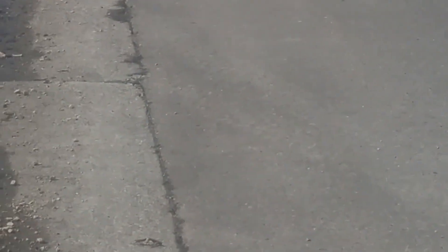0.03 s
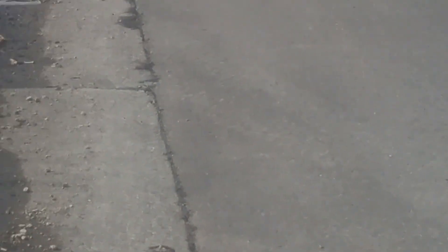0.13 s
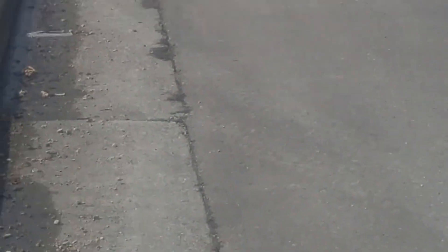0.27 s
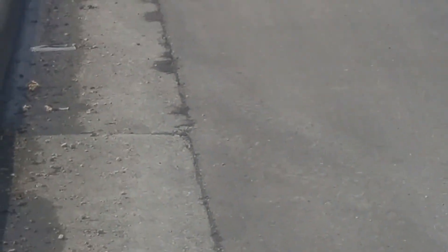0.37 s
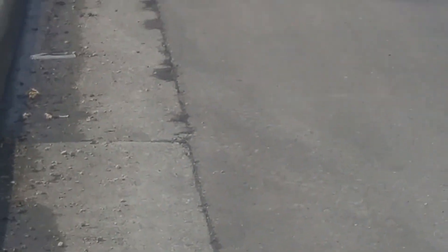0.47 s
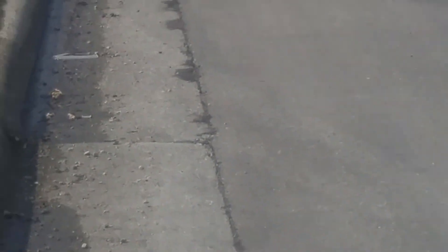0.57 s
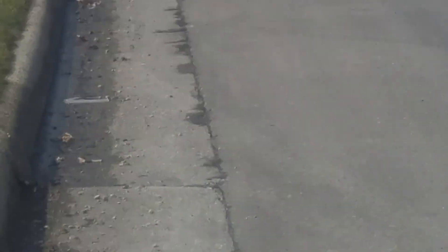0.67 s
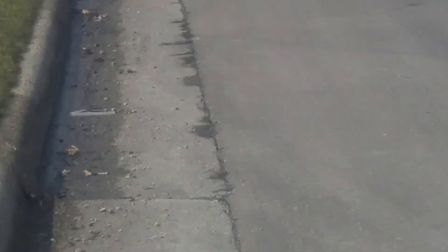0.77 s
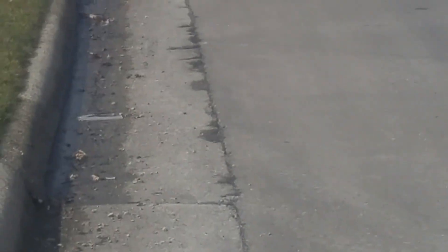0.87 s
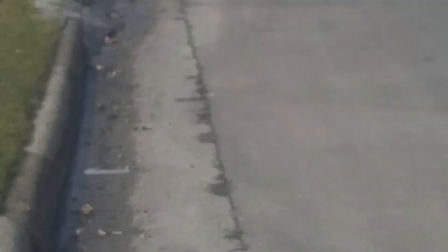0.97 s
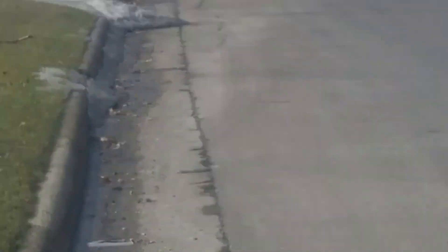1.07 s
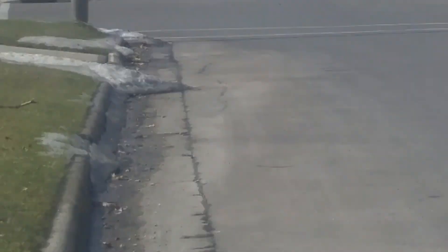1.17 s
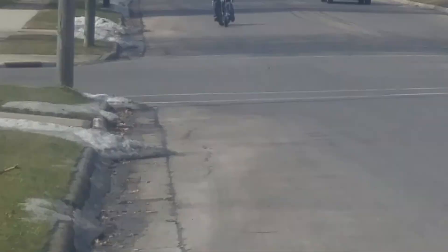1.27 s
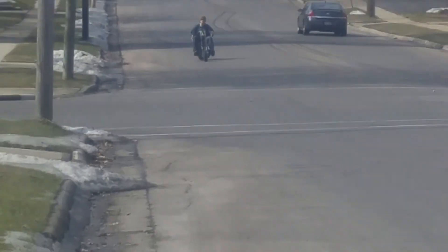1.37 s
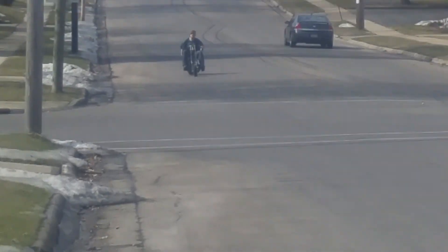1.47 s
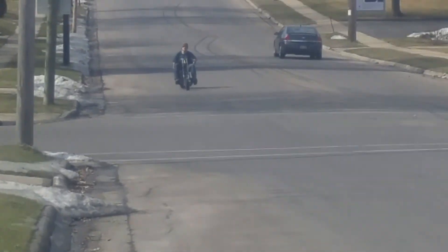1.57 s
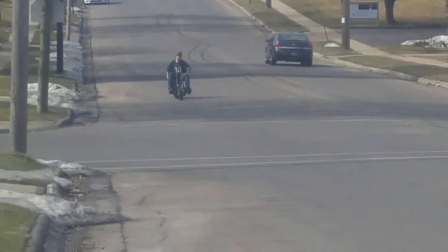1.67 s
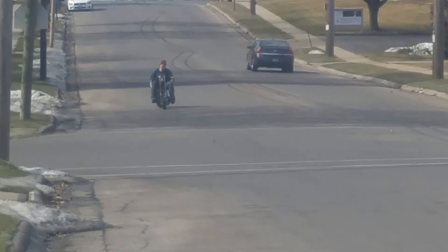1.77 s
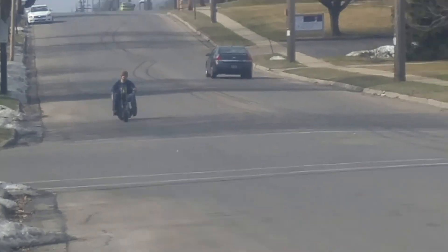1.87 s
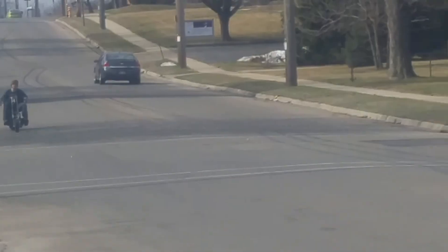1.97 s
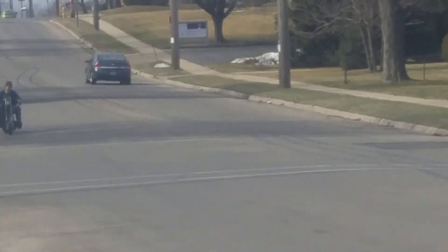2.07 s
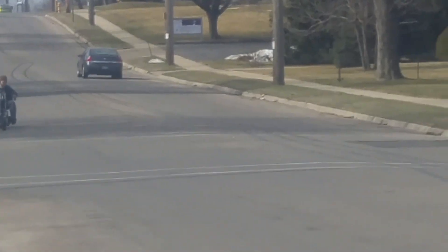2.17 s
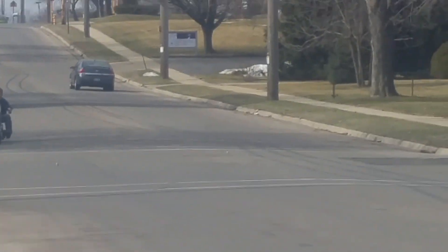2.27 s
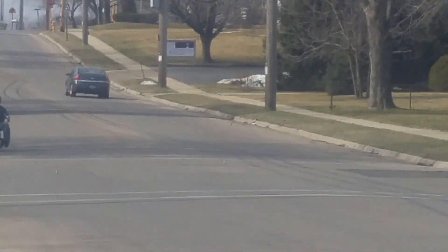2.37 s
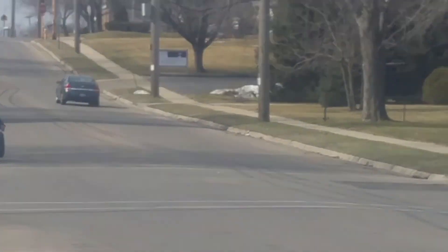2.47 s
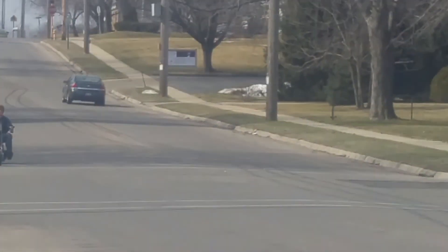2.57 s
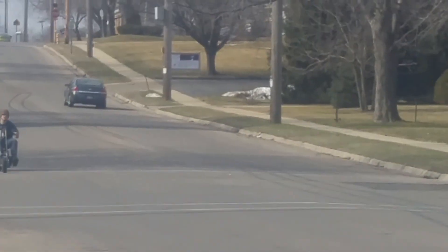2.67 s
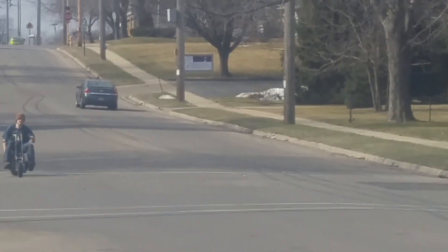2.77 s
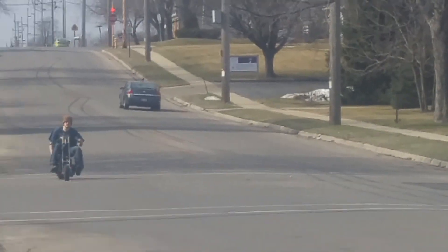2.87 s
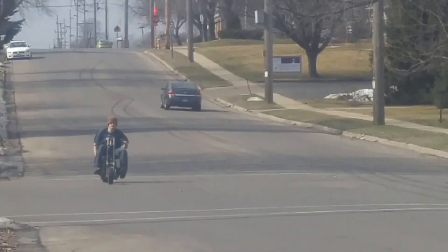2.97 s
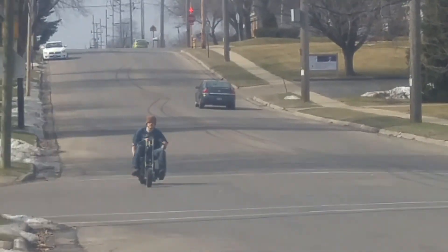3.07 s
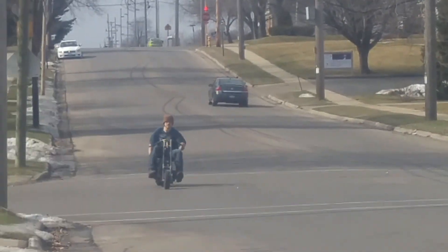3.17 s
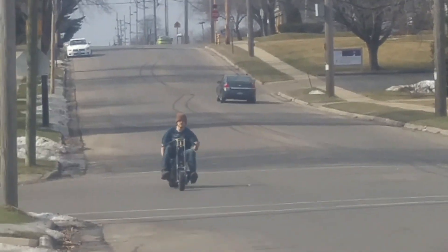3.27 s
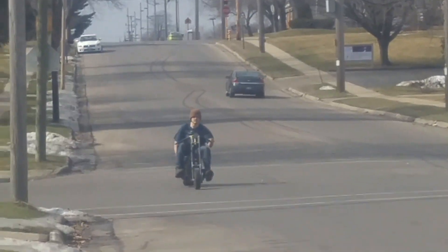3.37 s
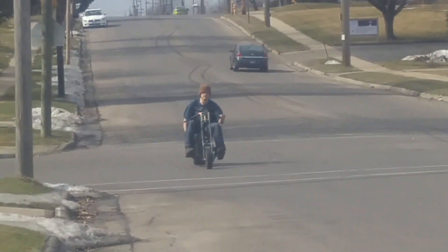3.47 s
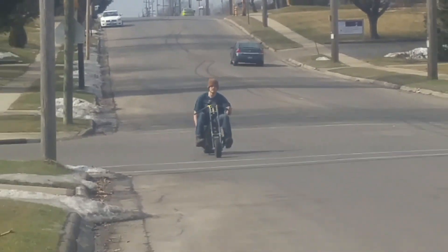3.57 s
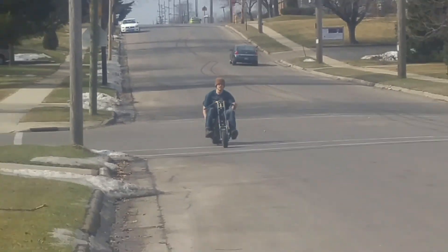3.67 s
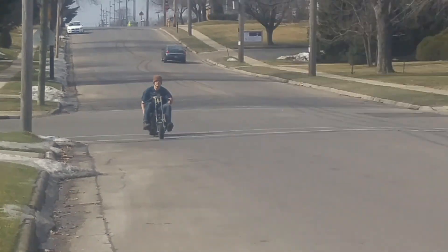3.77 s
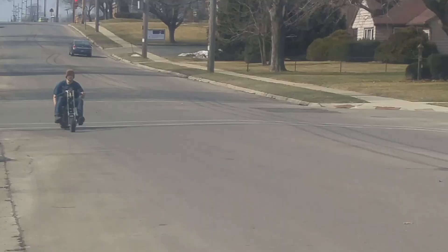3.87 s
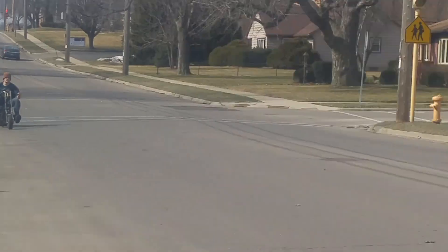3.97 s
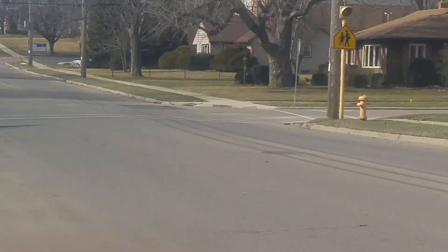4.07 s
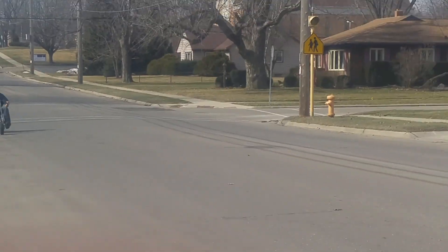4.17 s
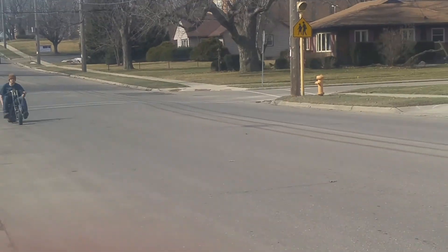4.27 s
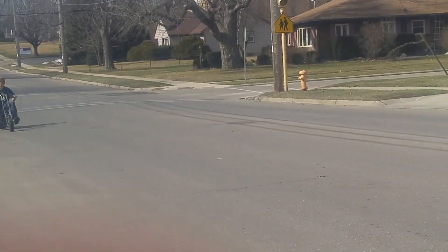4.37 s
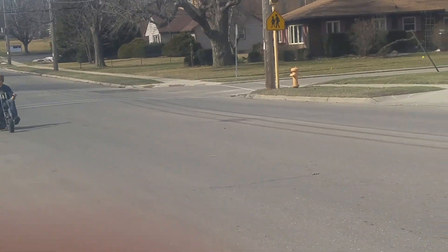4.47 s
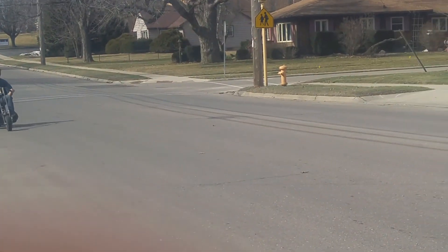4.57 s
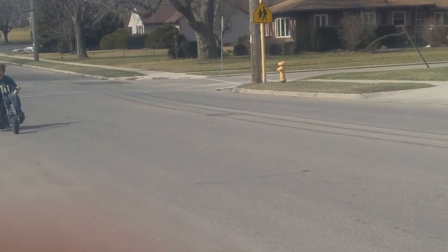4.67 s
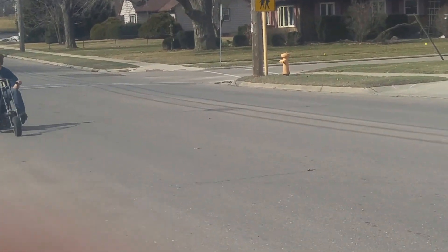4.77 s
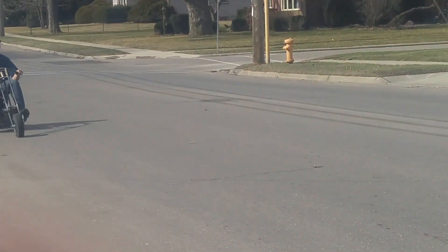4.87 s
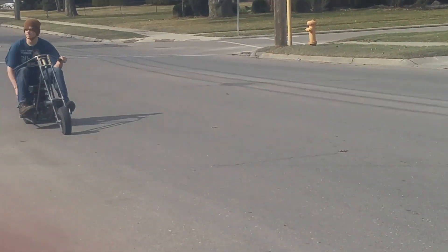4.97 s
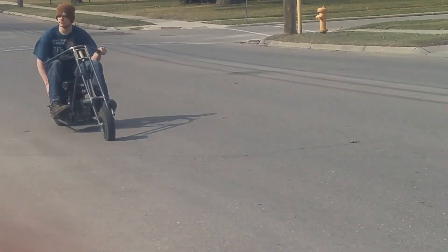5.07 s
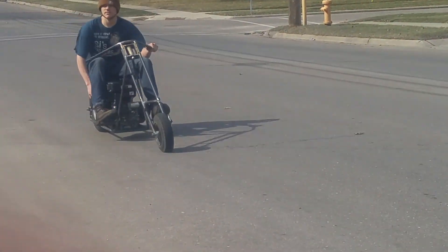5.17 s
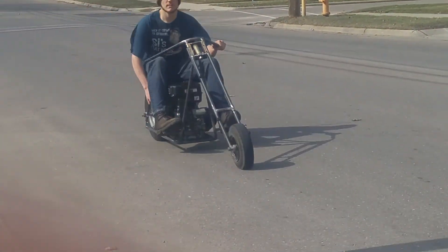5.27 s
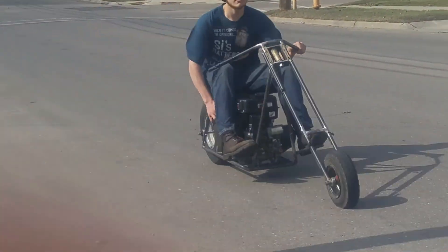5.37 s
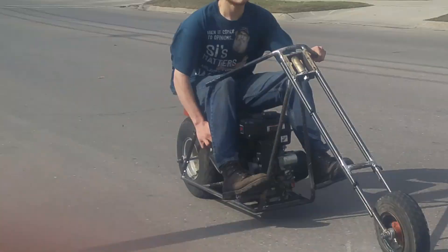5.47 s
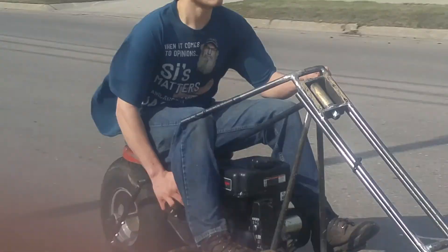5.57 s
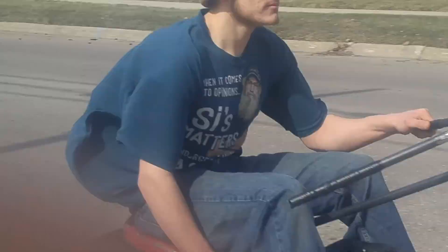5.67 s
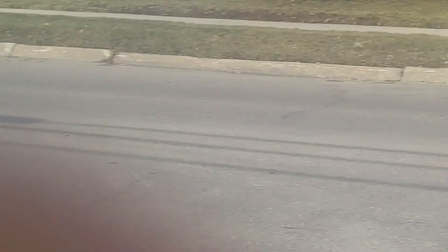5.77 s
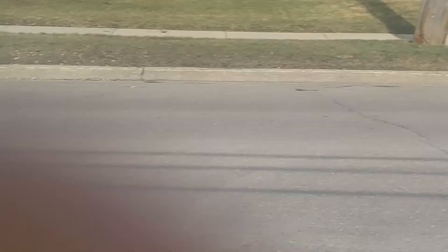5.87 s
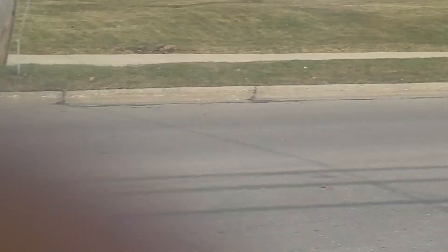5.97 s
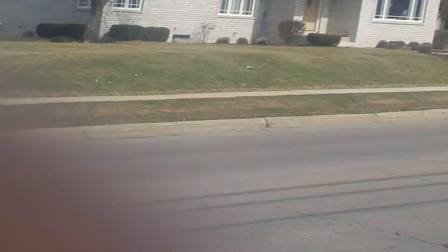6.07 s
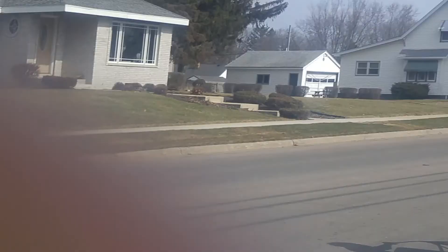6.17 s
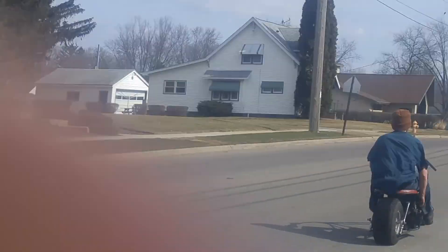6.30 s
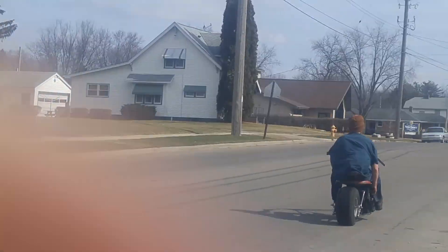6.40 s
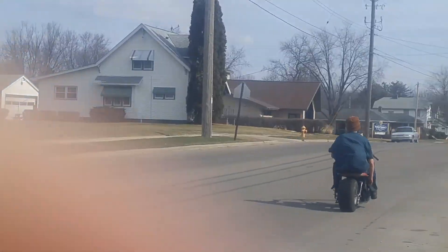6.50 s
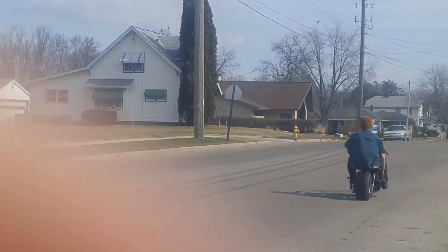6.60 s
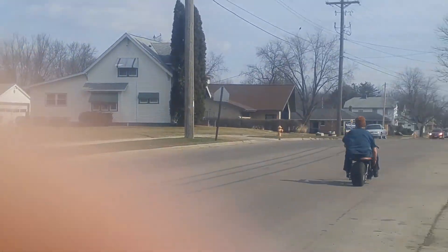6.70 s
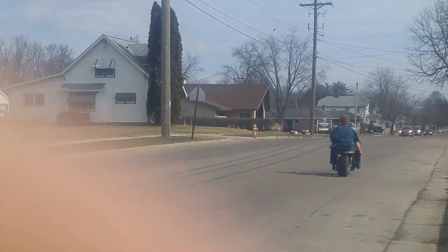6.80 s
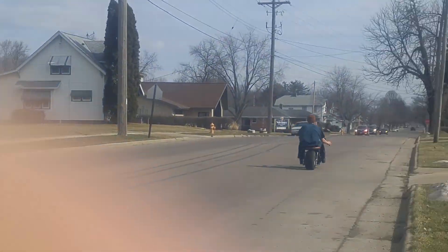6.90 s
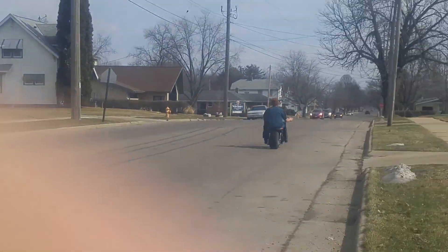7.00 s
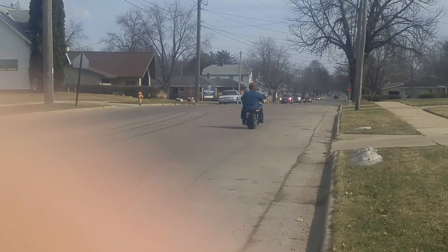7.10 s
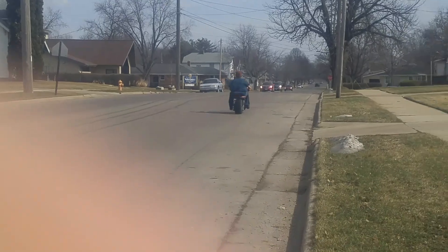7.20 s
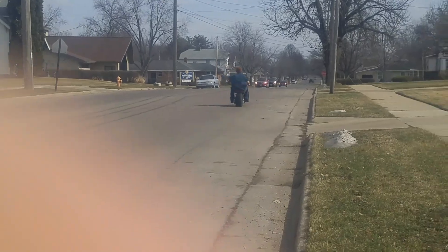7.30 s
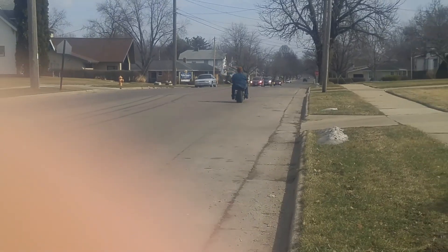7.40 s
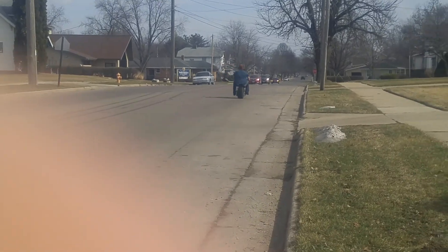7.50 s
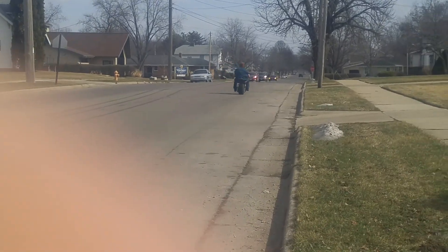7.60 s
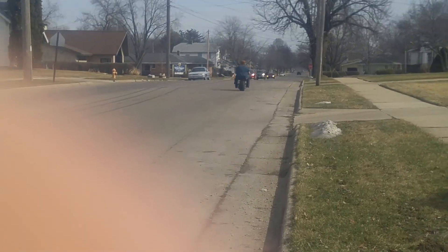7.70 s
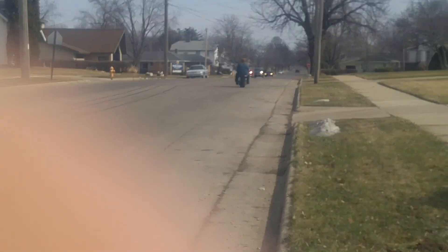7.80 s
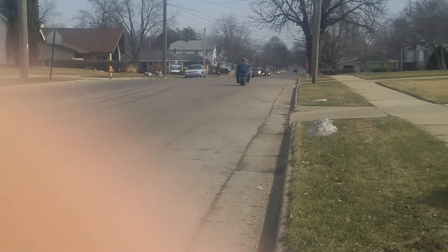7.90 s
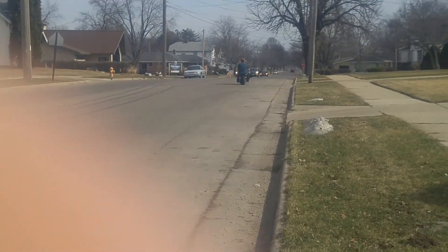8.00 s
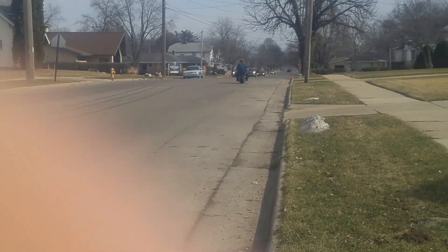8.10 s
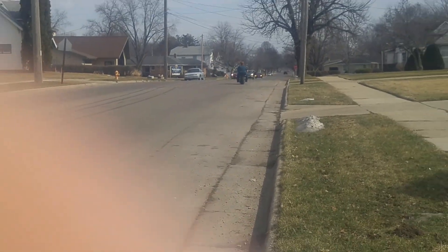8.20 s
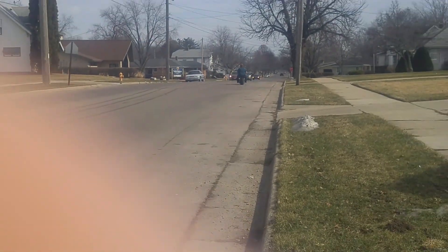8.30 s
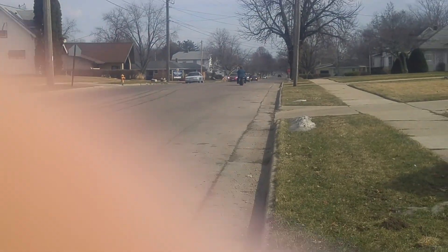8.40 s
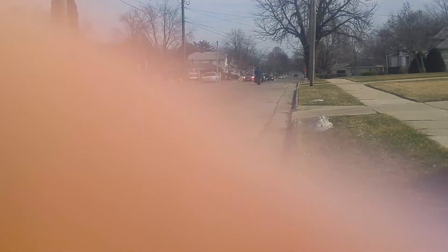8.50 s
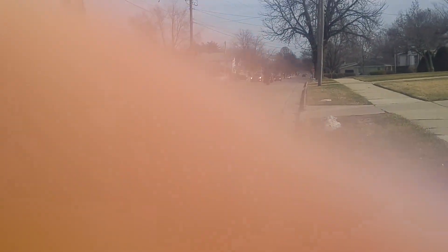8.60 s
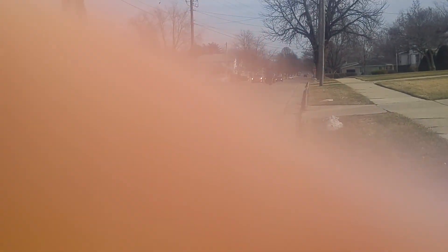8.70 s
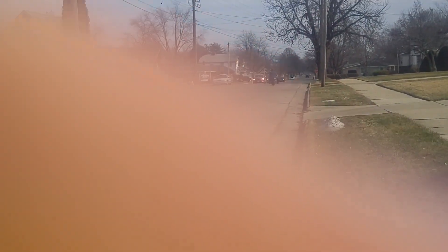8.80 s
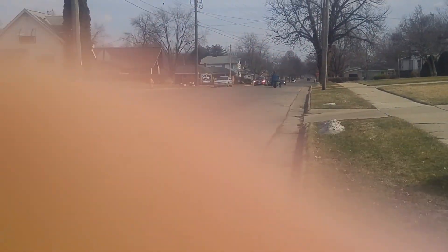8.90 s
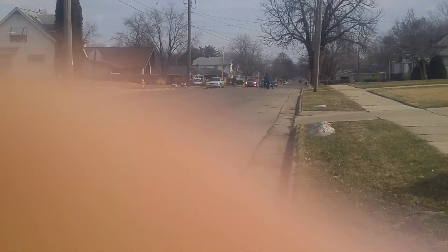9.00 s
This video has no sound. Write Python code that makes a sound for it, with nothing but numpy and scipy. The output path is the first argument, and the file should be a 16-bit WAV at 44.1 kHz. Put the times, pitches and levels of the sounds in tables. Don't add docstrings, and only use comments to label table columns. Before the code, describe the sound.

Outdoors on a residential street, gusts rumble and crackle on a hand-held phone at the kerb. A small single-cylinder motorbike chatters in the distance at a steady fast beat, with metallic ticking. It grows loud and raspy, chain whining, and passes close at about six seconds. Then the throttle shuts and it coasts off with uneven, slowing pops and light rattles.

```python
import sys
import numpy as np
from scipy import signal
from scipy.fft import rfft, irfft, next_fast_len
from scipy.io import wavfile
from scipy.ndimage import uniform_filter1d

SR = 44100
rng = np.random.default_rng(int(sys.argv[2]) if len(sys.argv) > 2 else 0)


def attenuation_scalar(level_db):
    decades = np.asarray(level_db, float) / 20
    return 10 ** decades


def output_pcm(signal):
    pcm = np.clip(np.atleast_2d(signal).T, -1, 1) * 32767
    wavfile.write(sys.argv[1], SR, np.round(pcm).astype(np.int16))


N = 399105

# time in seconds, level in dB.
WIND = [(0, -18), (.38, -20.5), (.55, -28), (1.0, -22), (1.5, -29), (2.0, -31), (2.18, -24), (2.47, -20),
        (2.55, -34), (3.6, -37), (3.9, -23), (4.5, -29), (5.2, -24), (7.0, -22), (7.6, -25), (8.27, -23),
        (8.7, -29), (8.85, -22.5)]
# middle in seconds, change in dB, half length in seconds.
GUSTS = [(1.21, -3, .12), (1.43, 3, .08), (1.76, -22, .06), (1.91, -21, .06), (2.04, -7, .05),
         (2.24, -4, .05), (2.9, 4, .04), (3.0, -16, .06), (3.07, 11, .05), (3.2, 7, .04), (3.25, -11, .04),
         (3.31, 12, .07), (3.45, -6, .07), (3.6, 9, .05), (3.73, -30, .09), (3.68, -12, .04),
         (2.705, -14, .025), (2.51, -8, .025), (0.08, 3, .15), (3.91, -8, .05), (4.33, -7, .06),
         (4.46, 5, .08), (4.81, -10, .08), (4.91, 9, .06), (5.06, -8, .05), (5.17, 7, .06), (5.62, 9, .12),
         (6.13, -14, .1), (6.23, 5, .1), (6.92, 2.5, .2), (.39, 4, .06), (.45, -6, .03), (7.005, 5, .025),
         (6.48, 4, .04), (7.26, 9, .04), (7.31, -6, .04), (7.48, 6, .09), (7.74, 5, .08)]
# frequency in Hz, level in dB.
RUMBLE = [(15, -44), (28, -10), (65, 0.5), (200, -3), (390, -8.5), (470, -21), (560, -14.5), (850, -16.5),
          (1200, -33), (2200, -25), (4000, -55)]
# time in seconds, dB above the deep rumble.
UPPER_WIND = [(2.55, 0), (2.7, 3), (3.7, 3), (3.9, 0), (4.05, -8), (6.6, -8), (6.8, 0), (7.3, -1), (7.5, -5),
              (8.3, -4), (8.6, 0), (9.05, -3)]
# start in seconds, peak in dB.
SNAPS = [(0.69, -15), (2.174, -13.5), (2.477, -7.5), (2.557, -16), (2.644, -10), (2.663, -14), (2.928, -15),
         (3.153, -15), (3.199, -12), (3.316, -12), (3.359, -13), (3.372, -13), (3.412, -14), (3.42, -16),
         (3.453, -17), (3.47, -16), (3.587, -13), (3.596, -13), (3.605, -12), (3.615, -15), (7.836, -9),
         (8.58, -14)]
# time in seconds, share of the echo from 0 to 1.
ROAD = [(5.1, .1), (5.5, 0.53), (6.08, 0.6), (6.15, 0.23)]
# frequency in Hz, level in dB per Hz.
ROAR = [(400, -20), (480, 0.5), (640, 1.5), (760, -12), (1000, -30)]
# time in seconds, pitch in Hz, level in dB.
CHAIN = [(3.82, 796, -45), (4.05, 795, -28.5), (4.35, 795, -37), (4.42, 792, -31), (5.1, 817, -32.5),
         (5.25, 842, -23), (5.4, 818, -24), (5.89, 828, -21), (6.05, 800, -26)]

# time in seconds, firings per second.
SPEED = [(0, 35.44), (.9, 35.39), (1.2, 35.16), (1.5, 35.53), (2.4, 35.23), (2.7, 35.59), (3.6, 34.96),
         (3.9, 35.54), (4.5, 35.18), (4.8, 35.65), (5.4, 35.54), (5.85, 34.65), (6.15, 30.19),
         (6.45, 30.83), (6.9, 27.11), (7.65, 24.08), (7.95, 23.77), (9.05, 18.97)]
# time in seconds, strength in dB.
MISFIRES = [(6.1, -5), (6.165, -6), (4.16, -2), (5.6, -5), (5.626, -1.5), (8.915, -5), (8.968, -5),
            (.225, -10), (1.98, -4), (6.132, 3), (6.198, 7.5), (4.725, 5.5), (4.838, 5), (4.384, 5),
            (4.133, 3.5), (8.575, -16), (8.815, -16), (6.525, 3), (6.625, 3), (6.66, 3.5), (6.694, 5.5),
            (6.982, 11.5), (6.947, -0.5)]
# start in seconds, peak in dB, ring in Hz.
POPS = [(6.664, -4, 1040), (6.697, -1, 1000), (6.732, -1, 1040), (6.762, 1.5, 910), (6.801, 2.5, 1040),
        (6.831, 0, 1060), (6.91, 1, 1080), (7.132, -7.5, 1090), (7.173, 0.5, 837), (7.209, -3, 1110),
        (7.329, -4, 970), (7.367, -5.5, 1070), (7.518, -3.5, 820), (7.563, -11, 684), (7.658, -11, 1030),
        (7.737, -10, 860), (7.779, -7.5, 1000), (7.824, -4, 786), (7.905, -10.5, 960), (7.946, -9.5, 800),
        (7.988, -11, 774), (8.072, -2, 996), (8.114, -5, 985), (8.16, -2.5, 1020), (8.202, -3.5, 1010),
        (8.248, -7, 888), (8.327, -4, 715), (8.387, -12, 912), (8.664, 1, 1010), (8.713, -2.5, 910),
        (8.761, -7, 780), (8.866, -14, 780), (9.012, -1, 935)]
# time in seconds, loudness in dB, how far the engine's flank faces
# the microphone in dB, clearness of the path in dB.
EXHAUST = [(0, -24, -9, -20), (.48, -29.5, -1.5, -30), (1.43, -24.5, -1, -35), (1.95, -29, -5, -22),
           (2.1, -32.5, 0.5, -13), (2.9, -37, 0.4, -21), (3.8, -32, 2.5, -18), (4.08, -27.5, 8, -22.5),
           (5.0, -27.5, 10, -13), (5.12, -28.5, 0.5, -4), (5.57, -20, 4, -10), (5.97, -16.5, 2.5, -6),
           (6.17, -24, 6, -13), (6.6, -23, 5, -12), (6.75, -28, -2, -19), (7.55, -38, -9.5, -13.5),
           (8.7, -38.5, -3, -16), (9.0, -29.5, -5.5, -20)]
# time in seconds, level in dB.
AIM = [(0, 6), (.36, 5.5), (.5, 2.5), (2.0, 1.5), (3.5, 3), (4.1, 0.5), (4.98, 0.5), (5.08, -2.5), (5.3, 8),
       (5.88, 8), (5.97, 1.5), (6.14, -3), (6.22, 5.5), (6.72, 4), (7.0, 7), (7.5, 2.5), (8.6, -1.5),
       (9.05, -1.5)]
# middle in seconds, change in dB, half length in seconds.
LIFTS = [
    (.9, -2.5, .4),
    (6.16, -5, .04),
    (6.33, -3, .1),
    (6.02, -2, .08),
    (2.705, -6, .03),
    (2.51, -4, .03),
]
# middle in seconds, change in dB, half length in seconds.
GLANCES = [
    (6.76, 2, .12),
    (7.7, 1.5, .4),
    (.9, 3, .6),
    (7.3, 5, .25),
    (8.2, 2.5, .3),
    (5.3, -4, .22),
    (3.36, 6, .17),
    (4.11, 4, .1),
    (6.68, 3, .08),
    (6.95, 2.5, .15),
]
# middle in seconds, change in dB, half length in seconds.
CLEARINGS = [
    (4.45, -3, .4),
    (5.2, 2.5, .2),
    (6.55, 3, .08),
    (7.0, 6, .2),
]
# middle in seconds, added share, half length in seconds.
BLURS = [
    (2.4, .12, .3),
    (6.82, .2, .08),
    (2.9, .25, .5),
    (6.72, .5, .13),
    (6.03, -.12, .1),
    (6.95, -.12, .12),
    (7.13, .2, .08),
    (7.75, -.22, .55),
    (8.5, .2, .3),
]

# frequency in Hz, level in dB, 60 dB decay in seconds.
PIPE = [(70, -0.5, 0.073), (174, 3.5, 0.034), (290.6, 5.5, 0.023), (383, -2.5, 0.032), (825, -9.5, 0.03)]
# frequency in Hz, gain in dB.
MUFFLER = [(25, -16), (60, 1.5), (410, 1), (500, -13), (680, -14), (780, 0.5), (2500, 11.5)]
# delay in seconds, level in dB.
WALLS = [(.0042, -12), (.0085, -8), (.0185, -9), (.024, -13)]
# middle in seconds, share, half length in seconds.
MOUTH = [
    (6.45, 1.1, .4),
    (4.1, .5, .2),
]
# frequency in Hz, level in dB per Hz.
BOOM = [(90, -30), (140, 13.5), (260, -5.5), (400, 5), (480, -15)]
CRACK = [(450, -4), (650, 0.5), (850, 3), (1100, -2), (1500, -4), (2300, -12.5), (3000, -18)]
RASP = [(1200, -25), (2000, 3), (3200, 4.5), (4500, 6), (5500, 5), (7000, -1)]
SIZZLE = [(4300, -16), (5600, -7.5), (7100, 0.5), (8400, -3), (9800, -21), (11500, -31.5)]
TOP = [(8500, 8), (10500, 8), (13000, 0.5), (15500, -7), (16300, -71)]
# time in seconds, level in dB, delay in seconds.
SLAP = [(3.66, -40, .007), (3.73, -5, .008), (3.8, -1, .010), (3.86, -4, .012), (4.0, -40, .015)]
# middle in seconds, dB over the rest level,
# half length in seconds, ring in Hz.
SHELL = [
    (0, 26, .5, 2800),
    (1.32, 25, .45, 3350),
    (3.81, 19, .16, 3250),
    (5.58, 27, .4, 2110),
    (6.5, 15, .35, 2270),
    (7.19, 18, .07, 3490),
    (7.9, 9, .7, 2280),
    (9.05, 21, .8, 2230),
]
# start in seconds, peak in dB, ring in Hz.
KNOCKS = [(0.0558, -11, 2810), (0.0838, -9, 2880), (0.1127, -6, 2820), (0.1406, -5, 2750),
          (0.1686, -9, 2760), (0.1965, -10, 4340), (0.2544, -12, 5610), (0.2828, -7, 7170),
          (0.3112, -6, 6920), (0.4225, -11, 7320), (0.4519, -10, 7430), (0.4804, -12, 5790),
          (0.5362, -13, 6170), (0.5642, -11, 6640), (0.5941, -9, 5790), (0.6215, -12, 5790),
          (0.6495, -12, 6290), (0.6789, -11, 5820), (0.7068, -14, 7500), (0.7348, -8, 7180),
          (0.7622, -11, 7080), (0.7911, -9, 6610), (0.8196, -11, 2720), (1.0161, -12, 6590),
          (1.0725, -6, 6690), (1.1009, -9, 6830), (1.1299, -7, 6740), (1.1578, -4, 6210),
          (1.1857, -8, 6490), (1.2142, -8, 7150), (1.2431, -6, 6530), (1.2711, -7, 3310),
          (1.2995, -9, 7020), (1.3284, -4, 3350), (1.3559, -8, 6190), (1.3843, -3, 7200),
          (1.4122, -4, 4670), (1.4412, -2, 5270), (1.4975, -10, 3370), (1.527, -9, 5910),
          (1.5534, -10, 4880), (1.5828, -5, 5730), (1.6108, -9, 6130), (1.6382, -7, 5910),
          (1.6677, -10, 6240), (1.6951, -8, 4550), (1.724, -8, 4890), (1.7515, -14, 6980),
          (1.7799, -7, 5930), (1.8083, -9, 4460), (1.8368, -10, 3330), (1.8652, -10, 5910),
          (1.8931, -11, 5900), (1.9216, -15, 5810), (1.95, -12, 4670), (2.0628, -15, 5410),
          (2.0917, -13, 4460), (2.1471, -16, 7280), (2.176, -15, 6240), (2.2613, -14, 4660)]
# start in seconds, peak in dB, ring in Hz.
CROSSING = [(3.6581, -18, 5280), (3.7165, -14, 5250), (3.7459, -8, 5020), (3.7733, -13, 5000),
            (3.8028, -6, 3290), (3.8322, -10, 3240), (3.8601, -13, 5140), (3.918, -15, 5270),
            (3.9469, -15, 4840), (3.9764, -14, 3290)]
# start in seconds, peak in dB, ring in Hz.
RATTLES = [(6.7307, -11, 3120), (6.8016, -13, 3000), (6.8325, -14, 4650), (6.8724, -9, 5530),
           (6.9118, -13, 2730), (6.9487, -15, 4230), (6.9851, -13, 4460), (7.0201, -12, 4640),
           (7.0575, -11, 3900), (7.1338, -22, 3800), (7.1752, -10, 3430), (7.2111, -9, 3520),
           (7.2525, -19, 2850), (7.2924, -24, 2850), (7.3294, -18, 4120), (7.3693, -13, 3470),
           (7.4092, -23, 3400), (7.4526, -20, 3490), (7.49, -24, 4240), (7.5339, -30, 2860),
           (7.5738, -26, 2970), (7.6157, -24, 2950), (7.6566, -24, 2900), (7.699, -24, 4560),
           (7.7384, -22, 4200), (7.7808, -18, 4410), (7.8222, -17, 2900), (7.8621, -26, 4310),
           (7.9055, -23, 4350), (7.945, -24, 3000), (7.9894, -25, 2880), (8.0323, -26, 2740),
           (8.0727, -19, 4190), (8.1166, -17, 4190), (8.1605, -17, 3530), (8.2039, -18, 3560),
           (8.2493, -18, 2830), (8.2977, -26, 4170), (8.3435, -26, 4340), (8.3904, -22, 3030),
           (8.4353, -25, 4530), (8.4638, -24, 2770), (8.5621, -28, 3000), (8.6224, -25, 3150),
           (8.6663, -15, 3150), (8.7117, -22, 3020), (8.7377, -22, 3640), (8.7611, -17, 3020),
           (8.815, -19, 3150), (8.8664, -16, 4880), (8.9172, -16, 4060), (8.9676, -18, 2750),
           (9.0135, -7, 5910)]
# start in seconds, peak in dB, ring in Hz.
CLANKS = [(7.452, -26, 2260), (7.4924, -27, 2410), (7.6974, -27, 2150), (7.7383, -27, 2190),
          (8.0336, -26, 2400), (8.2496, -27, 2190), (8.3449, -27, 2130), (8.4836, -27, 2170),
          (8.6248, -18, 2360), (8.8169, -21, 2170), (8.8682, -14, 2170), (8.9166, -17, 2270),
          (8.97, -15, 2160), (9.0139, -10, 2180)]
# frequency in Hz, width in Hz, depth in dB.
NOTCHES = [(505.6, 57, -7.5), (598.4, 76, -30), (1866, 173, -25), (2516, 106, -49), (7980, 100, -19)]

COASTING_S, CATCHING_S = 6.64, 7.07
PUFF_LEAD_S = .0004


def evened(x):
    return x / np.sqrt(np.mean(x ** 2) + 1e-20)


def curve(rows):
    s, *columns = np.transpose(rows)
    return [np.interp(np.arange(N) / SR, s, c) for c in columns]


def bumps(rows):
    s = np.arange(0, N / SR + .01, .002)
    total = sum(height * np.maximum(1 - abs(s - mid) / half, 0) for mid, height, half, *_ in rows)
    return curve(np.transpose([s, total]))[0]


def colour(x, points):
    size = next_fast_len(len(x))
    f, db = np.transpose(points)
    hz = np.fft.rfftfreq(size, 1 / SR)
    gain = attenuation_scalar(np.interp(np.log(hz + 1), np.log(f), db, -90, -90))
    return irfft(rfft(x, size) * gain, size)[:len(x)]


def train(at, size):
    clicks = np.zeros(N)
    clicks[np.clip((at * SR).astype(int), 0, N - 1)] = size
    return clicks


def levelled(x, order=5000):
    power = uniform_filter1d(uniform_filter1d(x ** 2, order), order)
    return x / np.sqrt(power + 1e-12)


def resonate(x, hz, width):
    turn = np.exp(2j * np.pi * np.cumsum(hz) / SR)
    r = np.exp(-np.pi * width / SR)
    smooth = signal.lfilter([(1 - r) ** 2], [1, -2 * r, r * r], x / turn)
    return 2 * (turn * smooth).real


def gusts_db():
    return curve(WIND)[0] + bumps(GUSTS)


def wind():
    lumps = evened(uniform_filter1d(uniform_filter1d(rng.standard_normal(N), 500), 500))
    struck = rng.random(N) < 900 / SR
    eddies = attenuation_scalar(3.5 * np.minimum(rng.exponential(1, N), 4)) * struck
    drive = evened(eddies * rng.choice([-1., .7], N)) + .5 * rng.standard_normal(N)
    gust = evened(colour(drive, RUMBLE))
    deep = colour(gust, [(5, 0), (110, 0), (170, -30)])
    balanced = deep + attenuation_scalar(curve(UPPER_WIND)[0]) * (gust - deep)
    return attenuation_scalar(gusts_db() + 3.07 * lumps + 4.0) * balanced


def snaps():
    at, db = np.transpose(SNAPS)
    t = np.arange(900) / SR
    burst = (t / 0.0015) * np.exp(1 - t / 0.0017)
    gate = signal.oaconvolve(train(at, attenuation_scalar(db - 5.5)), burst)[:N]
    return gate * evened(colour(rng.standard_normal(N), CRACK))


def tyres():
    alongside = (curve(ROAD)[0] / ROAD[2][1]) ** 3
    return alongside * attenuation_scalar(-19) * evened(colour(rng.standard_normal(N), ROAR))


def chain():
    hz, db = curve(CHAIN)
    first, last = CHAIN[0][0], CHAIN[-1][0]
    near, = curve([(first - .1, 0), (first, 1), (last - .1, 1), (last, 0)])
    return near * attenuation_scalar(db - 0.5) * evened(resonate(rng.standard_normal(N), hz, 51))


def rattles():
    out, t = np.zeros(N + 600), np.arange(600) / SR
    swell_s = .0013
    swell = (t / swell_s) * np.exp(1 - t / swell_s)
    rows = [(s, db - 9.5, hz) for s, db, hz in list(KNOCKS) + list(CROSSING) + list(RATTLES)]
    rows += [(s, db - 2.5, hz) for s, db, hz in CLANKS]
    for (s, peak_db, hz), (apart, turn) in zip(rows, rng.random((len(rows), 2))):
        k = int((s - PUFF_LEAD_S) * SR)
        second_hz = hz * (.94 + .12 * apart)
        pair = np.sin(2 * np.pi * hz * t) + .4 * np.sin(2 * np.pi * (second_hz * t + turn))
        out[k:k + 600] += attenuation_scalar(peak_db) * swell * pair
    return out[:N]


def firings():
    turns = .03 + np.cumsum(curve(SPEED)[0]) / SR
    at = np.interp(np.arange(1, int(turns[-1]) + 1), turns, np.arange(N) / SR)
    luck = rng.standard_normal((len(at), 2))
    db = 2.3 * luck[:, 0] + np.where(at > COASTING_S, -17 + 8, 0)
    hz = 900 * (1 + 0.3 * luck[:, 1])
    catching = (at > COASTING_S) & (at < CATCHING_S)
    db[catching] = 1.2 + 7.5 + luck[catching, 0]
    hz[catching] = 1040 * (1 + .04 * luck[catching, 1])
    for s, strength_db in MISFIRES:
        db[np.argmin(abs(at - s))] = strength_db
    for s, peak_db, ring_hz in POPS:
        k = np.argmin(abs(at - s))
        at[k], db[k], hz[k] = s, peak_db + 7.5, ring_hz
    return at, db, hz


def hiss_firings(at, db, loud_db):
    keep = at < RATTLES[0][0] - .015
    at, db = at[keep], db[keep]
    db = db + np.where(at < CROSSING[-1][0], -1.5, 0)
    for s, peak_db, _ in list(KNOCKS) + list(CROSSING):
        k = np.argmin(abs(at - s))
        at[k] = s - PUFF_LEAD_S
        db[k] = np.clip(peak_db - loud_db[int(s * SR)] - 14, -4, 5)
    s, peak_db, _ = np.transpose(RATTLES)
    return np.r_[at, s - PUFF_LEAD_S], np.r_[db, peak_db + 18]


def puffs(at, db, points, swell, tail, between, patchy_db):
    t = np.arange(1500) / SR
    shape = (t / swell) ** 2 * np.exp(-t / swell)
    shape = shape + tail * (1 - np.exp(-t / swell)) * np.exp(-t / 0.019)
    white = rng.standard_normal(N)
    hz, _, z = signal.stft(white, SR, nperseg=128)
    patches = evened(uniform_filter1d(rng.standard_normal((len(at) + 1, len(hz))), 2, 1))
    which = np.searchsorted(at, np.arange(z.shape[1]) * 64 / SR + 0.0015)
    patchy = signal.istft(z * attenuation_scalar(patchy_db * patches[which].T), SR, nperseg=128)[1][:N]
    gate = signal.oaconvolve(train(at, attenuation_scalar(db)), shape)[:N]
    road_echo = curve(ROAD)[0] * np.roll(gate, int(.0045 * SR))
    gate = levelled(gate + road_echo, order=9000)
    share = np.clip(between, 0, 1)
    puff = evened(colour(patchy, points))
    wash = evened(colour(white[::-1], points))
    return np.sqrt(1 - share ** 2) * gate * puff + share * wash


def shell(at, db, slap):
    knock = puffs(at, .6 * db, RASP, swell=.0011, tail=.02, between=.15, patchy_db=5)
    mid, _, half, ring_hz = np.transpose(SHELL)
    which = np.searchsorted(mid + half, np.arange(N) / SR)
    shell_hz = ring_hz[np.clip(which, 0, len(mid) - 1)]
    ring = resonate(knock + 3 * slap, shell_hz, 370)
    return attenuation_scalar(bumps(SHELL) - 50) * levelled(ring, order=9000)


def hiss(at, db, slap, rasp_db, between):
    _, flank_db, clear_db = curve(EXHAUST)
    sizzle_db = rasp_db + flank_db + bumps(GLANCES)
    top_db = sizzle_db + clear_db + bumps(CLEARINGS)
    rasp = puffs(at, 0.58 * db, RASP, swell=0.0014, tail=0.058, between=1.36 * between, patchy_db=3.4)
    sizzle = puffs(at, 0.75 * db, SIZZLE, swell=0.0014, tail=0.033, between=0.95 * between, patchy_db=1.5)
    top = puffs(at, 1.3 * db, TOP, swell=0.00093, tail=.05, between=0.72 * between, patchy_db=1.5)
    return attenuation_scalar(rasp_db) * (rasp + slap) + attenuation_scalar(sizzle_db) * sizzle + attenuation_scalar(top_db) * top


def crack(at, db, loud_db, between):
    open_db = 4 / (1 + np.exp((6.1 - np.arange(N) / SR) / .05))
    gust_db = .55 * np.maximum(bumps(GUSTS), -5)
    crack_db = -13 + .52 * loud_db + curve(AIM)[0] + open_db + gust_db
    noise = puffs(at, db, CRACK, swell=.0012, tail=.15, between=1.5 * between, patchy_db=4)
    return attenuation_scalar(crack_db - 4) * noise


def pops(at, db, hz):
    out, t = np.zeros(N + 600), np.arange(600) / SR
    swell = (t / .001) * np.exp(1 - t / .001)
    thud = -.7 * np.sin(2 * np.pi * 300 * t) * (t / 0.0014) * np.exp(1 - t / 0.0016)
    for s, g, f in zip(at, db, hz):
        if s > COASTING_S:
            k = int(s * SR)
            ring = np.sin(2 * np.pi * f * t) + .45 * np.sin(2 * np.pi * 1.5 * f * t)
            out[k:k + 600] += attenuation_scalar(g - 11.5) * (swell * ring + thud)
    return out[:N]


def thump(at, db):
    t = np.arange(3000) / SR
    ring = sum(-attenuation_scalar(g - 60 * t / t60) * np.sin(2 * np.pi * hz * t) for hz, g, t60 in PIPE)
    blows = at + .0008 + .00022 * rng.standard_normal(len(at))
    direct = signal.oaconvolve(train(blows, attenuation_scalar(.45 * db)), ring)[:N]
    heard = direct + sum(attenuation_scalar(g) * np.roll(direct, int(s * SR)) for s, g in WALLS)
    boom = attenuation_scalar(-5.5) * puffs(at, .5 * db, BOOM, swell=.002, tail=.3, between=.5, patchy_db=1.5)
    s = np.arange(N) / SR
    near = (s > 3.86) & (s < 6.72)
    level_db = np.where(near, curve(AIM)[0] - 19.5, gusts_db() - 4.5)
    pipe = levelled(colour(heard, MUFFLER))
    mouth_band = signal.butter(1, (130, 230), "bandpass", fs=SR, output="sos")
    mouth = bumps(MOUTH) * signal.sosfilt(mouth_band, pipe)
    return attenuation_scalar(uniform_filter1d(level_db, 900)) * (pipe + mouth + boom)


def exhaust():
    at, db, hz = firings()
    loud_db = curve(EXHAUST)[0]
    rasp_db = loud_db + bumps(LIFTS)
    between = .47 - .004 * (rasp_db + 29) + bumps(BLURS)
    low = thump(at, db) + pops(at, db, hz)
    cracks = crack(at, db, loud_db, between)
    at, db = hiss_firings(at, db, loud_db)
    late = np.interp(at, *np.transpose(SLAP)[::2])
    slap = puffs(at + late, .3 * db, RASP, swell=.0007, tail=.01, between=0, patchy_db=4)
    slap = attenuation_scalar(curve(SLAP)[0]) * slap
    return cracks + hiss(at, db, slap, rasp_db, between) + shell(at, db, slap) + rattles() + low


def scene():
    return (wind() + snaps() + tyres() + chain() + exhaust())[None]


def low_pass(x):
    return signal.sosfilt(signal.butter(12, 16310, fs=SR, output="sos"), x)


def record(dry):
    size = next_fast_len(N)
    hz = np.fft.rfftfreq(size, 1 / SR)
    gain = np.prod([1 - (1 - attenuation_scalar(db)) / (1 + (2 * (hz - f) / w) ** 2) for f, w, db in NOTCHES], 0)
    gain = gain * hz ** 2 / (hz ** 2 + 40 ** 2)
    x = irfft(rfft(dry, size) * gain, size)[:, :N]
    x = x / (1 + abs(x / .98) ** 4) ** .25
    edge = signal.firwin(511, 16330, window=("kaiser", 9), fs=SR)
    mix = signal.oaconvolve(x, edge[None], "same")
    return low_pass(mix)


dry = scene()
out = record(dry)
output_pcm(out)
```